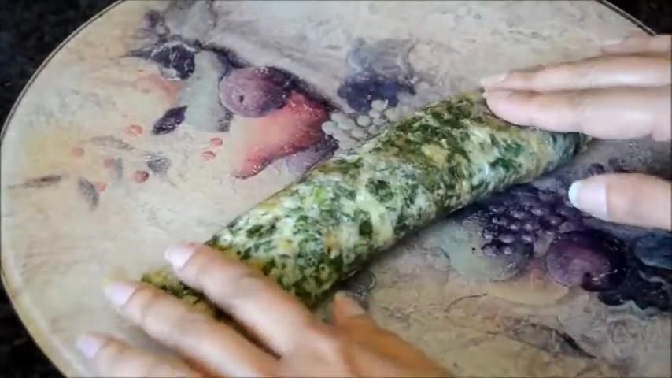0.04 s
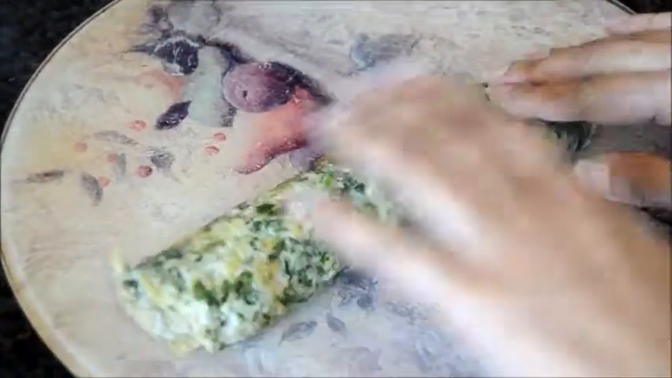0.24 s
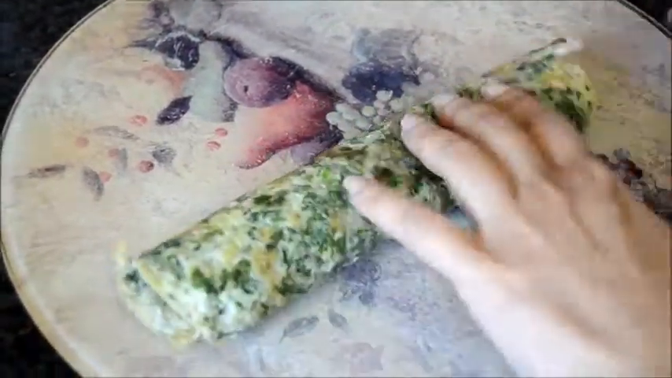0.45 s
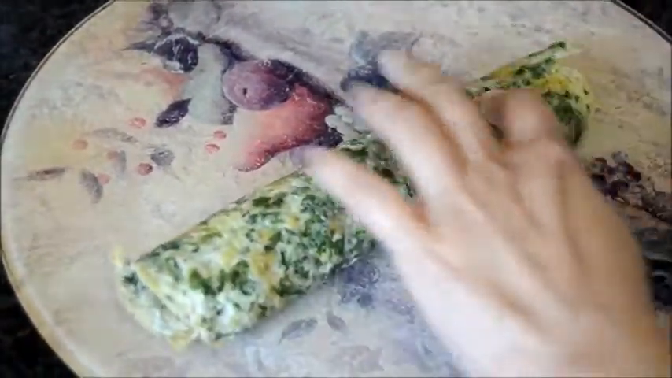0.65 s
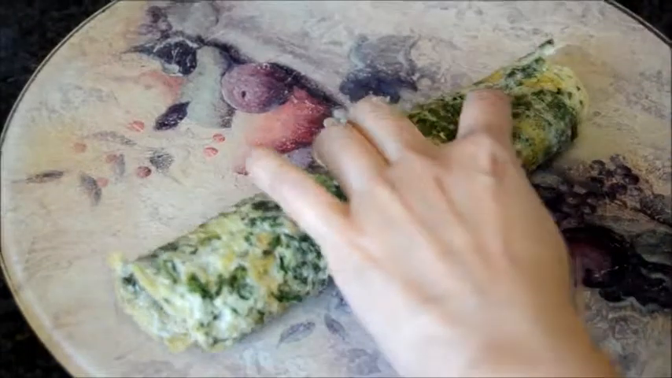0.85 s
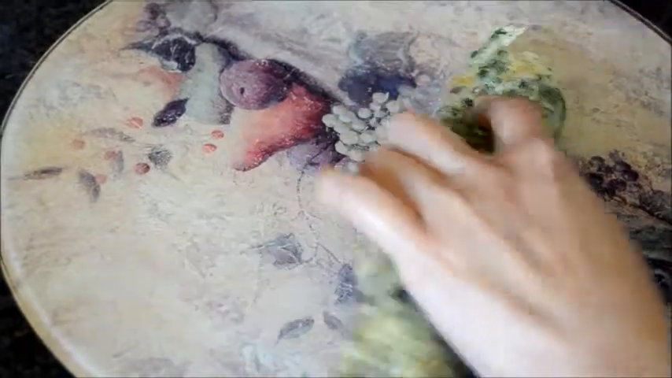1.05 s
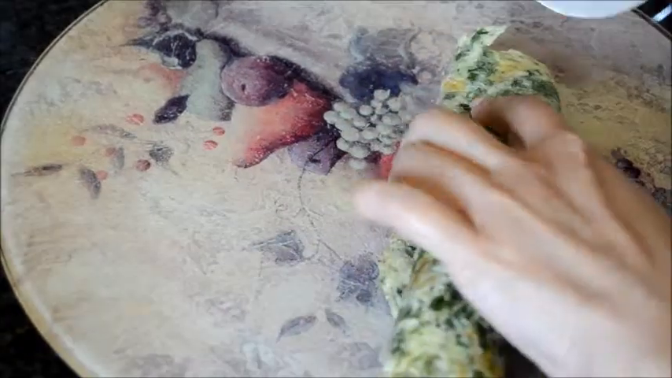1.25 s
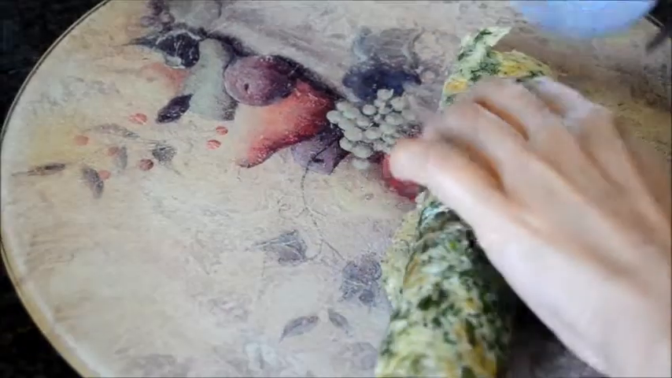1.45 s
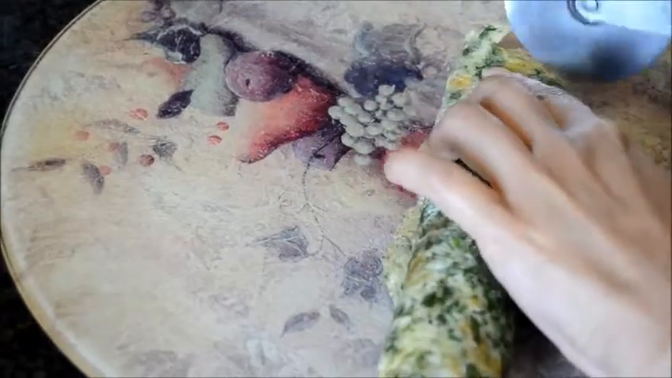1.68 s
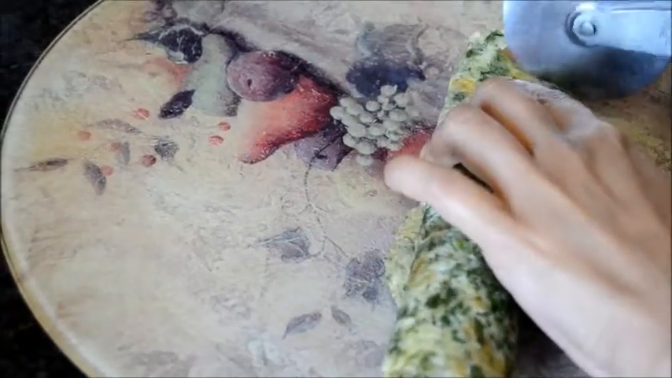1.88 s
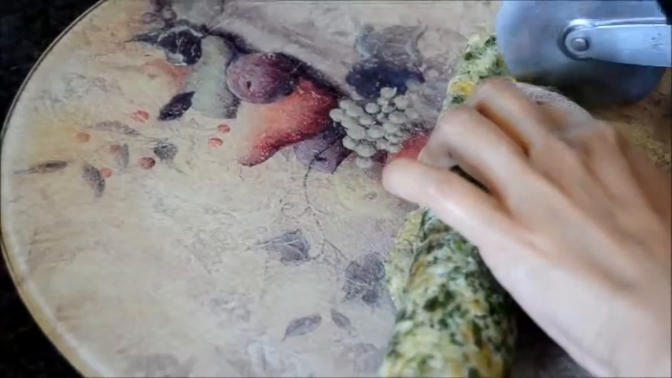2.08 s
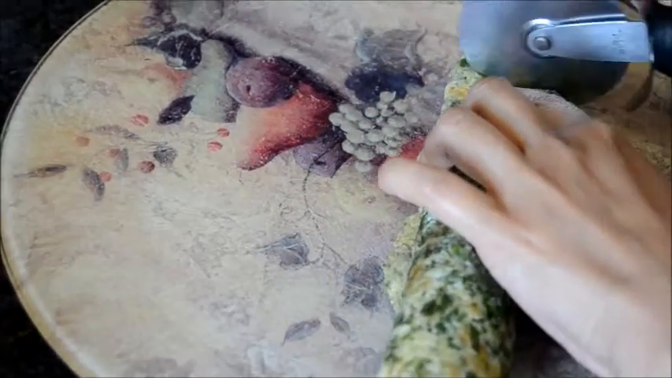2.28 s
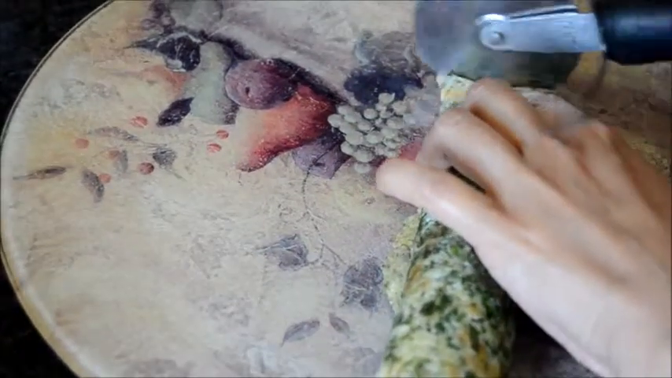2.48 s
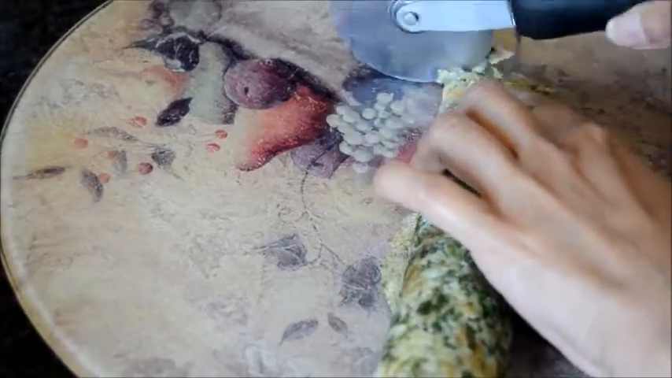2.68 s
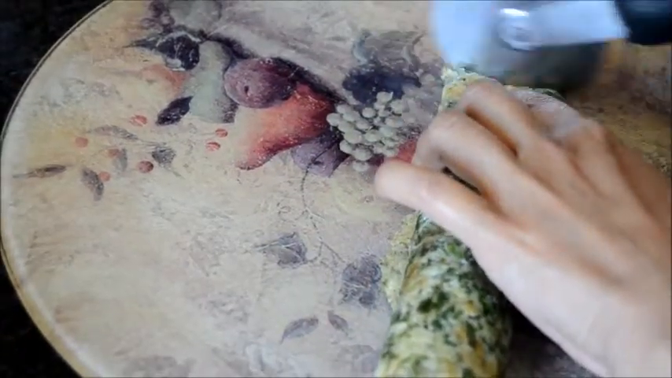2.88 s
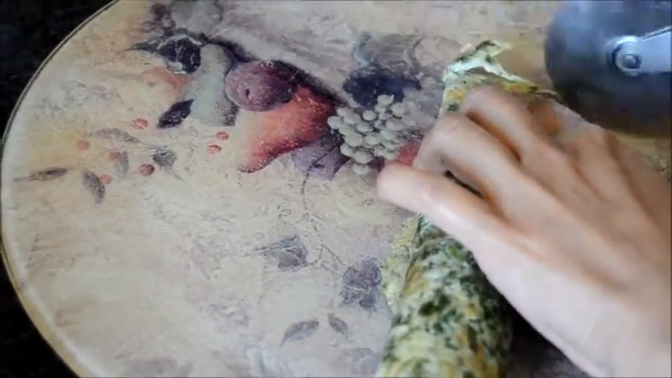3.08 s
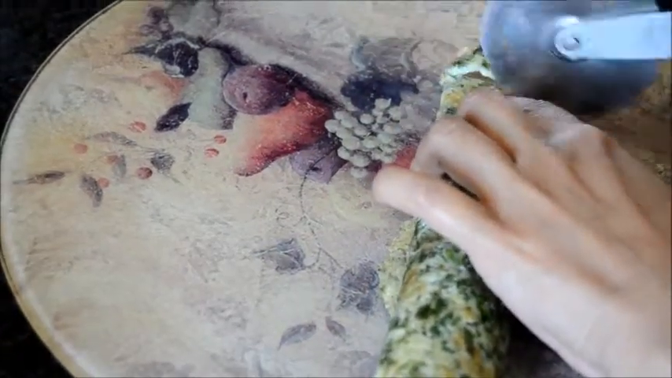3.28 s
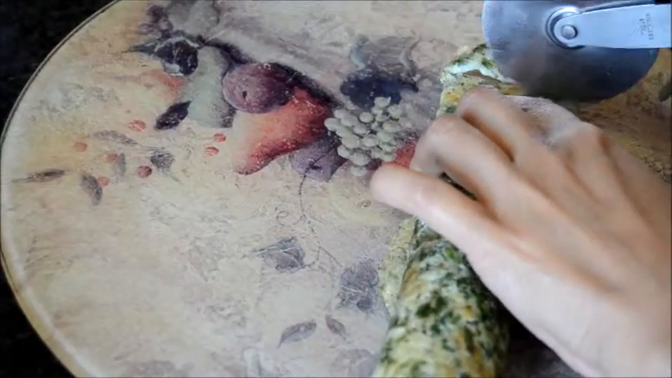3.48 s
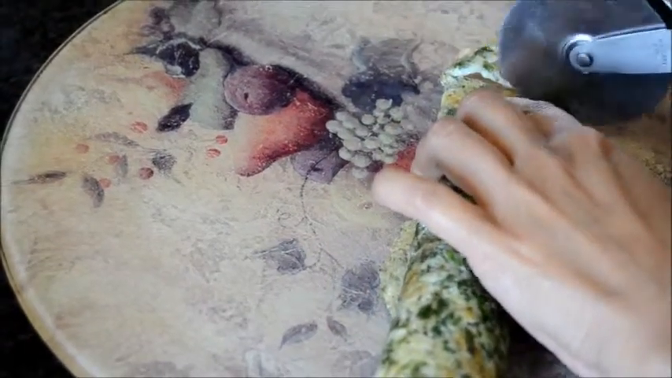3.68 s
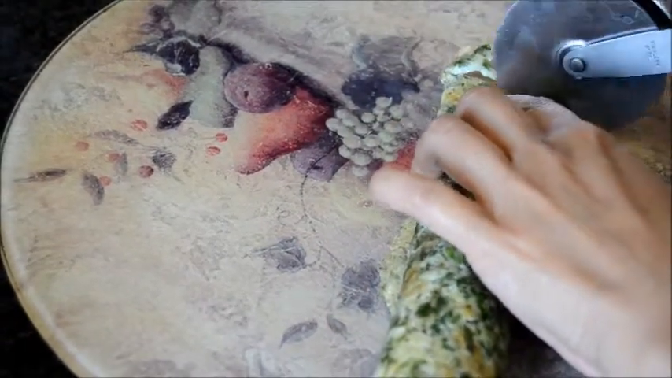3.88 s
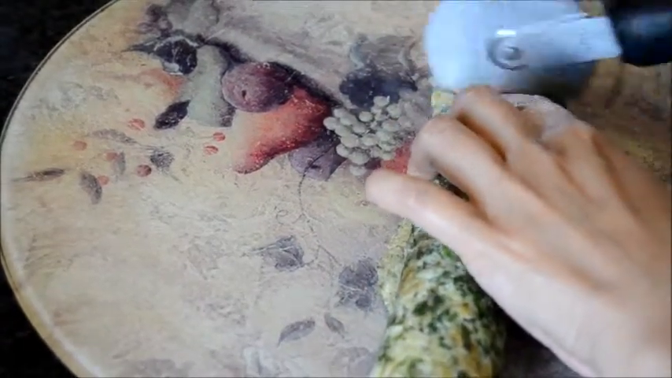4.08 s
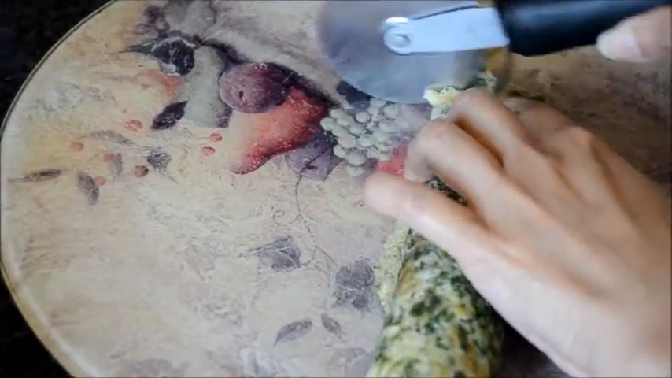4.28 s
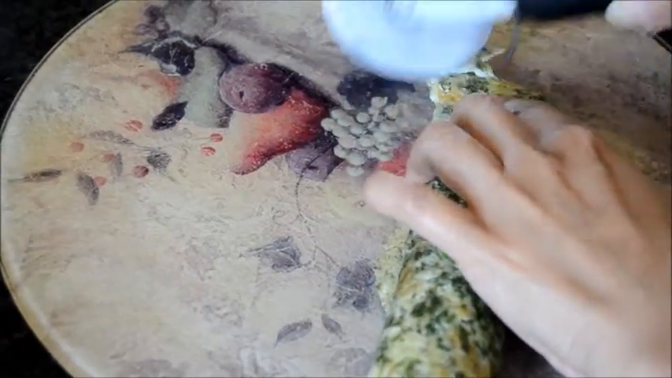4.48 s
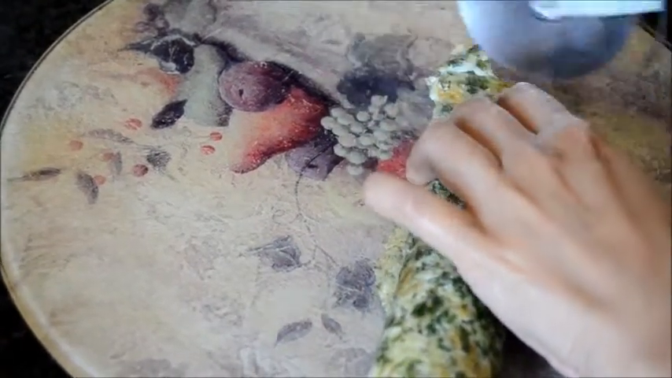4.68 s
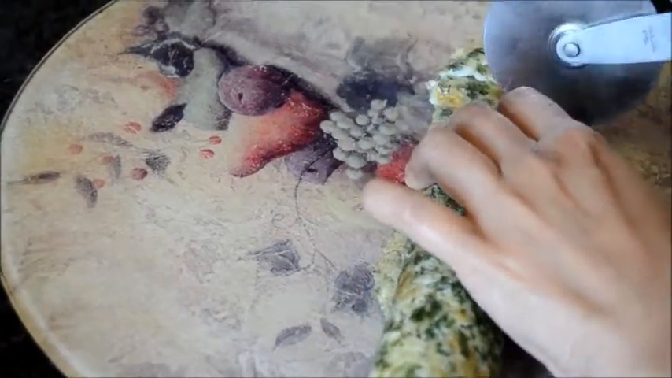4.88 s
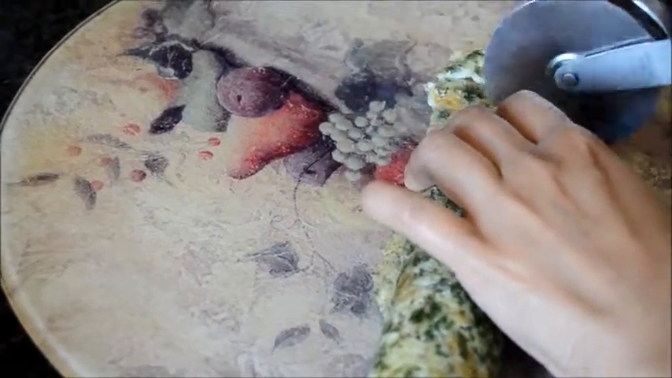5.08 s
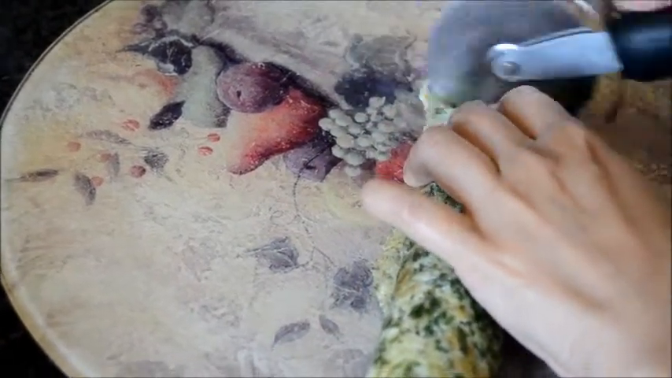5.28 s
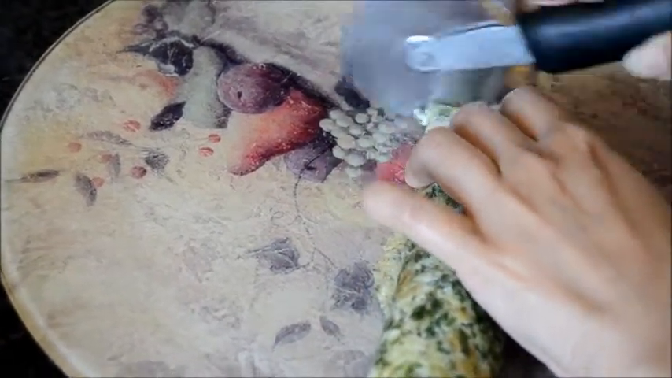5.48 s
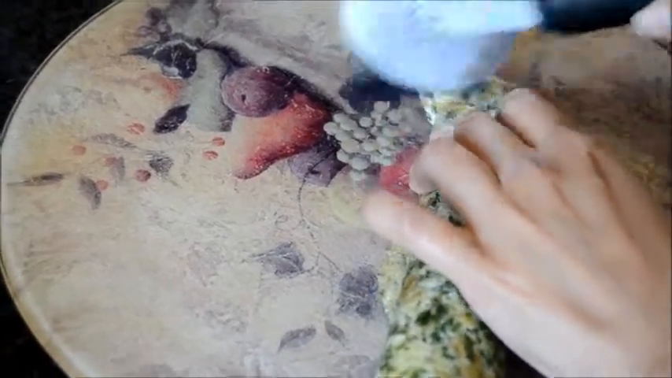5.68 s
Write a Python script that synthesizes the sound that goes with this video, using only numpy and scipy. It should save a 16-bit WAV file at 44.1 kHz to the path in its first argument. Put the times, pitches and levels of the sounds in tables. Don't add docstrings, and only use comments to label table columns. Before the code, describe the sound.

A quiet kitchen with soft low hum and a faint fridge drone, heard close. From 0 to 0.7 s, fingers on a moist rolled omelette give tiny sticky ticks and a barely audible rustle. At 0.75-1.0 s a steel cutter clatters against other metal: light scrape, taps, two firm knocks, bright rattle and a thin fading ring. Sparse moist ticks continue to 2.1 s. From 2.4 to 3.2 s the wheel rolls onto a hard glass-like board, gritty and scraping, its loose disc knocking irregularly, ending in a heavier knock at 3.17 s with a faint metallic ring. Quiet food ticks follow, one crisper at 3.6 s. Light rattles build from 4.05 s into the loudest, sharp clustered crack at 4.3 s, with a short room tail. After a lull, 5.2-5.7 s brings weaker rubbing, small taps and a faint final ring. Soft hand thuds lie almost hidden underneath.

```python
import sys
import numpy as np
from scipy import signal
from scipy.fft import rfft, irfft
from scipy.io import wavfile
from scipy.ndimage import uniform_filter1d

SR = 44100
rng = np.random.default_rng(int(sys.argv[2]) if len(sys.argv) > 2 else 0)


def int16_out(signal):
    q = np.round(np.clip(np.atleast_2d(signal).T, -1, 1) * 32767)
    wavfile.write(sys.argv[1], SR, q.astype(np.int16))


def makeup_ratio(level_db):
    decades = np.asarray(level_db, float) / 20
    return 10 ** decades


N = 253479

# start in seconds, firmest moment in seconds, lift in seconds, pressure in dB, brightness in dB.
STROKES = [(2.372, 2.384, 3.17, -51.5, -1), (2.498, 2.642, 2.6, -39.5, -9), (2.768, 2.952, 3.18, -32, 2.5),
           (3.875, 3.906, 3.96, -56.5, -22), (3.99, 3.995, 4.65, -51.5, 1), (4.076, 4.256, 4.3, -39.5, -20),
           (4.747, 4.751, 4.884, -62.5, 9.5), (5.077, 5.18, 5.25, -62, -3), (5.21, 5.361, 5.48, -42, -6),
           (5.382, 5.502, 5.54, -40.5, -17), (5.653, 5.7, 5.8, -69, -20)]


def unit(x):
    return x / np.sqrt(np.mean(x ** 2))


def shape(x, table):
    hz, db = np.transpose(table)
    bins_hz = np.arange(513) * SR / 1024
    log_gain = np.interp(np.log(bins_hz + 1), np.log(hz), db) * np.log(10) / 20
    ceps = irfft(log_gain)
    ceps[1:512] *= 2
    ceps[513:] = 0
    response = unit(irfft(np.exp(rfft(ceps)))) / 32
    return signal.fftconvolve(x, response)[:len(x)]


def ring(x, hz, width):
    r = np.exp(-np.pi * width / SR)
    zeros = np.array([1, 0, -1]) * (1 - r * r) / 2
    poles = [1, -2 * r * np.cos(2 * np.pi * hz / SR), r * r]
    return signal.lfilter(zeros, poles, x)


def walk(rate):
    count = int(N * rate / SR) + 2
    levels = rng.standard_normal(400)[:count]
    return np.interp(np.arange(N) * (rate / SR), np.arange(count), levels)


def curve(table, column):
    rows = np.array(table)
    return np.interp(np.arange(N) / SR, rows[:, 0], rows[:, column], left=-200, right=-200)


def add(track, s, sound):
    i = int(s * SR)
    track[i:i + len(sound)] += sound[:N - i]


def rattle(length, lumps_db, blow):
    t = np.arange(3072) / SR / max(length, 0.0003)
    chatter, lumps = rng.standard_normal((2, 3072))
    force = chatter * makeup_ratio(lumps_db * lumps) * np.exp(-t) * np.minimum(t / 0.6, 1)
    force = force / np.sqrt(np.sum(force ** 2))
    force[8] += blow
    return force / np.sqrt(1 + blow ** 2)


def favour(force, hz, share):
    force = force + share * ring(force, hz, hz / 6.4)
    return force / np.sqrt(np.sum(force ** 2))


def body(force, modes, skin, skin_db, wander_db, rate):
    out = makeup_ratio(skin_db) * shape(force, skin)
    for k, (hz, width, db) in enumerate(modes):
        share = (-1) ** k * (1 + np.log(makeup_ratio(wander_db)) * walk(rate))
        out = out + makeup_ratio(db) * ring(force * share, hz, max(width, 8))
    return out


def pressure(start, firmest, lift, db):
    ease_db, roundness = 35, 1.6
    moments = [start - 1, start, firmest, lift, lift + 1]
    far = np.abs(np.interp(np.arange(N) / SR, moments, [-9, -1, 0, 1, 9]))
    return np.where(far > 1, -200, db - ease_db * far ** roundness)


def knocks():
    # start in seconds, peak in dB, brightness in dB, favoured pitch in Hz.
    jolts = [(2.367, -40, -3.5, 1610), (2.552, -28, -26, 1670), (2.582, -22, -16, 1850),
             (2.627, -17.5, -15, 2520), (2.69, -25, -12.5, 2100), (2.8123, -23.5, -13, 2520),
             (2.8467, -16.5, -21, 2520), (2.883, -26, -4, 1370), (3.1633, -23, -22, 1460),
             (3.166, -13, -26, 1600), (4.2927, -13.5, -19.5, 3080), (4.2966, -8.5, -8.5, 2280),
             (4.3077, -13.5, -26, 2370), (4.3231, -19.5, -1.5, 1380), (4.4749, -32.5, -10.5, 1330),
             (5.176, -34.5, -13, 2030), (5.2853, -30.5, -20, 2050), (5.357, -37.5, 1, 2500),
             (5.582, -26.5, -15.5, 1230), (5.6788, -33, -25, 2380)]
    # start in seconds, peak in dB, favoured pitch in Hz.
    wobbles = [(2.291, -43.5, 2160), (2.658, -25.5, 950), (2.776, -33, 1751), (2.803, -29, 2190),
               (2.8248, -26, 2080), (2.8704, -15.5, 2710), (2.8997, -22, 1370), (2.935, -19, 2250),
               (2.957, -21, 2250), (2.9871, -18.5, 2400), (3.038, -22, 2000), (3.0515, -22, 2120),
               (4.0704, -33.5, 2100), (4.154, -36, 2800), (4.1734, -34, 2110), (4.2044, -29, 3140),
               (4.227, -30.5, 1390), (4.2637, -28.5, 1370), (4.695, -47, 1130), (4.756, -43, 1350),
               (5.303, -40, 1370), (5.19, -48, 1830), (4.249, -40, 1350), (5.43, -32, 2060),
               (5.4474, -31.5, 1310), (5.4979, -43, 1370), (5.5265, -28.5, 1300), (5.5604, -30.5, 1970)]
    blows = []
    for s, db, bright_db, hz in jolts:
        length = 0.0029 * np.exp(-0.09 * (db + 26.5))
        blows.append((s, db, bright_db, length, hz))
    for s, db, hz in wobbles:
        blows.append((s, db, -15.5, 0.0042, hz))
    return blows


def board():
    # pitch in Hz, width in Hz, level in dB.
    board_modes = [(864, 190, -9.5), (950, 26.3, -1.5), (1300, 33, -8.5), (1370, 9.6, 9.5), (1850, 37, -2),
                   (1947, 15, 4.5), (2168, 105, -1.5), (2390, 30, 2), (2520, 53.5, -1.5), (2760, 25, -2.5),
                   (3050, 26, -6), (3292, 92, -3.5), (3780, 13, -46), (3910, 42, -4.5), (4090, 36, 0.5),
                   (4600, 42, -8), (4950, 77, -1.5), (5490, 200, -8), (5465, 55, -5.5), (6396, 134, -3),
                   (6420, 123, -8), (6830, 180, -19), (7040, 40, -54), (7310, 84, -22.5), (8430, 113, -11),
                   (8950, 41, -20), (9760, 130, -33), (9900, 50, -57), (10570, 36, -27)]
    # frequency in Hz, density in dB per Hz.
    board_skin = [(150, -58.5), (250, -21.5), (506, -22.5), (805, -5.5), (1040, -6.5), (1340, 8.5),
                  (1580, -1.5), (2550, -2.5), (3460, -1), (4000, -0.5), (6360, -20), (8760, -20),
                  (11500, -40), (15000, -59), (22000, -120)]
    split_hz = 4000

    grain_db = 2.5 * np.minimum(rng.exponential(size=N), 3)
    grains = rng.standard_normal(N) * makeup_ratio(grain_db) * (rng.random(N) < 0.04)
    rubbing = 0.5 * rng.standard_normal(N)
    grit = (unit(grains) + rubbing) * makeup_ratio(3.4 * walk(55))

    low, high = np.zeros(N), np.zeros(N)
    for *push, bright_db in STROKES:
        push_db = pressure(*push)
        low += grit * makeup_ratio(push_db + 1.5)
        high += grit * makeup_ratio(push_db + bright_db + 6)
    for s, db, bright_db, length, hz in knocks():
        force = rattle(length, lumps_db=4.0, blow=1.15) * makeup_ratio(db + 24)
        s += 0.0008
        add(low, s, favour(force, hz, share=1.7) * makeup_ratio(db + 20))
        add(high, s, force * makeup_ratio(bright_db + 12.0))

    below = signal.butter(3, split_hz, fs=SR, output="sos")
    above = signal.butter(3, split_hz, "high", fs=SR, output="sos")
    force = signal.sosfilt(below, low) + signal.sosfilt(above, high)
    return body(force, board_modes, board_skin, skin_db=-15, wander_db=3.5, rate=25)


def clatter():
    # start in seconds, peak in dB, rattle length in seconds, favoured pitch in Hz, focus (ratio).
    contacts = [
        (0.74, -56, 0.013, 1570, 2.7),
        (0.751, -42, 0.03, 1410, 6.6),
        (0.813, -36, 0.011, 3260, 2.9),
        (0.8214, -40.5, 0.0076, 3640, 2.1),
        (0.8662, -25, 0.0068, 2100, 0.62),
        (0.8731, -19.5, 0.0099, 2140, 0.73),
        (0.8872, -25, 0.0094, 4870, 2.1),
        (0.9118, -27.5, 0.023, 5160, 0.63),
        (0.9505, -34.5, 0.037, 5130, 0.66),
    ]
    # pitch in Hz, width in Hz, level in dB.
    cutlery_modes = [(730, 87, -24), (1650, 16, -4), (1856, 12.5, 0.5), (2080, 26, -24), (2800, 130, -1.5),
                     (3260, 43, 0), (3390, 40, 2.5), (3420, 86, -20), (3980, 49, -4.5), (4440, 15, -13),
                     (4480, 33, 4), (5470, 32, -14), (5110, 57, -12), (6300, 28, -19), (6010, 15, -12),
                     (5960, 84, -5), (6410, 34, 12), (6760, 30, -17), (7140, 29, 3), (7200, 63, -10),
                     (8070, 36, 7), (8600, 42, -10), (8800, 15, -13), (8400, 11, -4), (8960, 9.6, -57),
                     (8600, 26, 0), (10100, 39, -9), (10300, 38, -33)]
    # frequency in Hz, density in dB per Hz.
    cutlery_skin = [(120, -68), (200, -14.5), (563, -16.5), (776, 0.5), (1310, -10), (1840, 4.5),
                    (2300, -4), (4300, 5.5), (7660, 2.5), (9070, 16.5), (11500, -26), (15000, -55),
                    (22000, -120)]
    force = np.zeros(N)
    for s, db, length, hz, focus in contacts:
        blow = rattle(length, lumps_db=6.0, blow=0.31)
        add(force, s, favour(blow, hz, max(focus, 0)) * makeup_ratio(db + 24.0))
    return body(force, cutlery_modes, cutlery_skin, skin_db=-7, wander_db=3.5, rate=25)


def wheel():
    disc_decays = {440: 0.22, 950: 0.15, 2417: 1.3, 3895: 1.5, 5582: 1.5, 6476: 0.39, 6988: 0.6, 7547: 2.5,
                   8450: 0.12, 9216: 0.56, 9760: 1.86}
    # (pitch in Hz, level in dB).
    chimes = [
        (0.875, [(2417, -54.5), (5582, -66), (6988, -43), (7547, -59), (9216, -41), (9760, -59)]),
        (1.294, [(2417, -68), (3895, -69.5)]),
        (1.56, [(2417, -71)]),
        (3.166, [(440, -51), (5582, -70), (6476, -63), (6988, -64), (7547, -92), (9216, -66), (9760, -78)]),
        (5.68, [(950, -43), (9250, -62.5), (8400, -57)]),
    ]
    t, out = np.arange(2 * SR) / SR, np.zeros(N)
    for s, woken in chimes:
        for hz, db in woken:
            nearest = min(disc_decays, key=lambda mode: abs(mode - hz))
            t60 = disc_decays[nearest]
            beat = 1 + 0.5 * np.sin(2 * np.pi * (hz / 900 * t + rng.random()))
            add(out, s, makeup_ratio(db - 60 * t / t60) * beat * np.sin(2 * np.pi * hz * t))
    return out


def food():
    # start in seconds, peak in dB, centre in Hz.
    moist_ticks = [(0.0468, -45, 5970), (0.149, -49, 6490), (0.187, -47.5, 4930), (0.406, -46, 6410),
                   (0.4243, -44, 6200), (0.5611, -51.5, 4170), (0.65, -53, 3400), (1.254, -40.5, 3420),
                   (1.293, -44.5, 3300), (1.356, -43, 4560), (1.485, -60, 3420), (1.56, -44.5, 6000),
                   (1.705, -51, 2710), (1.762, -46.5, 2390), (1.827, -48, 2330), (1.869, -43, 6300),
                   (1.931, -47, 2160), (2.057, -46.5, 6700), (2.139, -47, 2300), (3.395, -49.5, 5650),
                   (3.536, -64, 2390), (3.631, -37.5, 4440), (3.713, -50, 8300), (3.747, -54, 8450),
                   (3.764, -45.5, 1710), (4.884, -56, 2550), (4.929, -63, 5300), (4.986, -49, 6370),
                   (5.081, -44.5, 5860), (5.132, -52, 3150)]
    # frequency in Hz, density in dB per Hz.
    rustle_colour = [(1180, -28.5), (2000, 4.5), (2350, -1), (2930, -3.5), (6590, 1), (7980, -10.5),
                     (8710, 1.5), (10500, -11), (11500, -45), (15000, -86), (22000, -120)]
    # time in seconds, level in dB.
    fingers = [(0.0, -71), (0.25, -79), (0.7, -74), (0.95, -58.5), (1.34, -70.5), (2.11, -76), (2.45, -59),
               (2.7, -92), (3.5, -88.5), (4.2, -69), (4.35, -56), (4.53, -88), (4.82, -85.5), (5.05, -64.5),
               (5.62, -67.5), (5.75, -96)]
    pushed_db = np.max([pressure(*push) for *push, _ in STROKES], axis=0)
    squash_db = -63.5 + 0.2 * (pushed_db + 39.5)
    stir = np.hypot(makeup_ratio(curve(fingers, 1)), makeup_ratio(squash_db))
    rustle = unit(shape(rng.standard_normal(N), rustle_colour))
    out = rustle * stir * makeup_ratio(-0.65 + 3.9 * walk(28))
    for s, db, hz in moist_ticks:
        top_db = -10 - (db + 53)
        force = rattle(0.008, lumps_db=-5.5, blow=0.54)
        moist = ring(ring(force, hz, 0.53 * hz), hz, 1.0 * hz)
        crisp = ring(ring(force, 8200, 3000), 8200, 3000)
        tick = moist + makeup_ratio(top_db) * crisp
        add(out, s, tick / np.abs(tick).max() * makeup_ratio(db - 2.3))
    return out


def thuds():
    # start in seconds, peak in dB, pitch in Hz.
    hand_pushes = [
        (0.829, -56, 110.),
        (2.93, -69, 45.),
        (3.62, -74, 35.),
        (4.359, -61, 91),
        (5.05, -68, 40.),
        (5.191, -53.5, 123),
        (5.629, -68, 45.2),
    ]
    out, t = np.zeros(N), np.arange(SR // 5) / SR
    for s, db, hz in hand_pushes:
        push = rng.standard_normal(len(t)) * t * np.exp(-t / 0.015)
        push = ring(ring(push, hz, 1.0 * hz), hz, 1.0 * hz)
        add(out, s, push / np.abs(push).max() * makeup_ratio(db))
    return out


def hum():
    # frequency in Hz, density in dB per Hz.
    hum_colour = [(20, -25), (45, -16.5), (100, -7.5), (135, -19.5), (190, -1), (300, -3.5), (500, -2),
                  (800, -4.5), (1500, -7.5), (3000, -16), (6000, -20.5), (9000, -28), (10500, -32.5),
                  (11600, -60)]
    noise = rng.standard_normal(N)
    hz, db = np.transpose(hum_colour)
    colour = makeup_ratio(np.interp(np.log(np.fft.rfftfreq(N, 1 / SR) + 1), np.log(hz), db))
    drone = unit(ring(rng.standard_normal(N), 183.4, 20.0)) * makeup_ratio(-72.5 + 0.89 * walk(6.06))
    tone = unit(irfft(rfft(noise) * colour, N))
    return tone * makeup_ratio(-62 + 0.7 * walk(2.6)) + drone


def room():
    # frequency in Hz, time to fall 60 dB in seconds.
    room_decays = [(300, 0.51), (1500, 0.31), (4000, 0.31), (10000, 0.17)]
    tail_db, gap_s = -5.5, 0.006
    t, tail = np.arange(SR // 2) / SR, 0
    hz, t60 = np.transpose(room_decays)
    for centre in 250 * 2.0 ** np.arange(0, 5.6, 0.5):
        band = ring(ring(rng.standard_normal(len(t)), centre, centre / 3), centre, centre / 3)
        band_t60 = np.interp(np.log(centre), np.log(hz), t60)
        tail = tail + unit(band) * np.sqrt(centre) * makeup_ratio(-60 * t / band_t60)
    tail = tail * np.minimum(t / gap_s, 1) ** 2
    direct = t == 0
    answer = makeup_ratio(tail_db) * tail / np.sqrt(np.sum(tail ** 2)) + direct
    power = np.abs(rfft(answer)) ** 2
    ripple_db = 10 * np.log10(uniform_filter1d(power, size=40) / uniform_filter1d(power, size=800))
    return shape(answer, np.c_[2.0 * np.arange(len(power)) + 1, -ripple_db])


def scene():
    # frequency in Hz, gain in dB.
    mic_colour = [(60, -7), (130, 6.5), (250, 8), (7300, -6), (7900, -10.5), (8500, -8), (10300, -4),
                  (11000, -8.5), (11600, -20)]
    walls = room()
    near = shape(board() + clatter(), mic_colour) * makeup_ratio(-0.56) + food()
    in_room = signal.fftconvolve(near, walls)[:N]
    return (in_room + wheel() + thuds() + hum())[None]


def roll_off(x):
    return signal.sosfilt(signal.butter(12, 11660, fs=SR, output="sos"), x)


def record(dry):
    return roll_off(dry)


dry = scene()
out = record(dry)
int16_out(out)
```